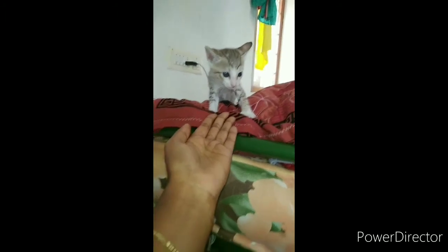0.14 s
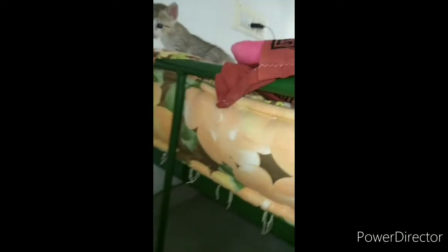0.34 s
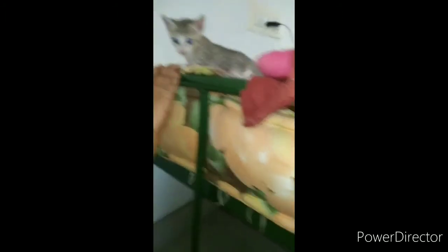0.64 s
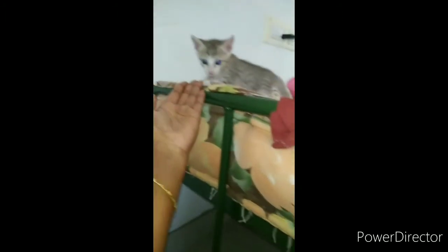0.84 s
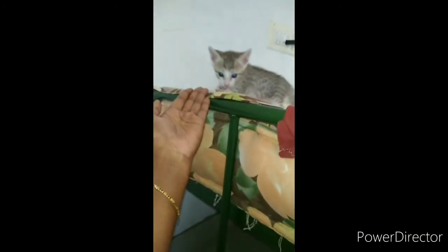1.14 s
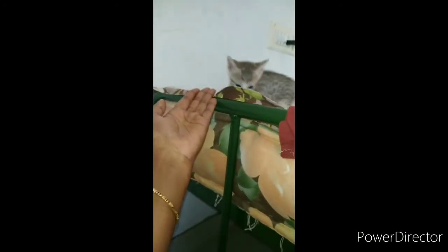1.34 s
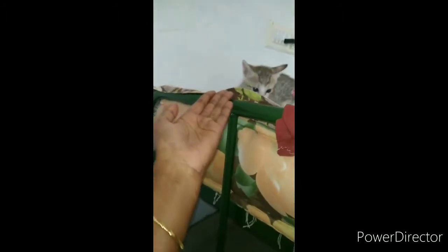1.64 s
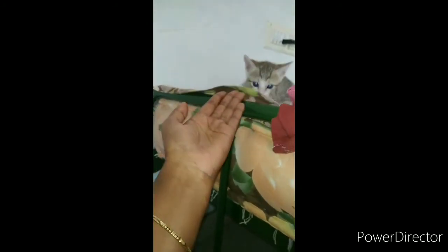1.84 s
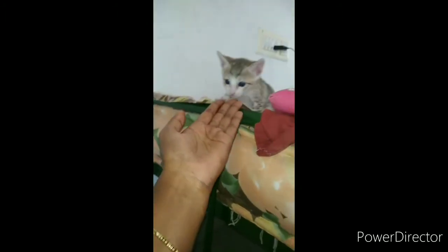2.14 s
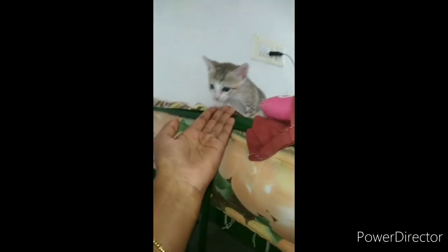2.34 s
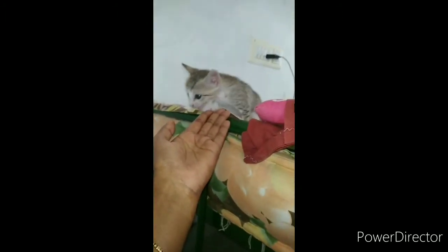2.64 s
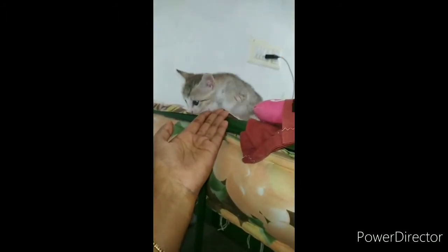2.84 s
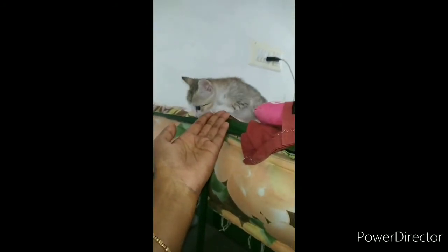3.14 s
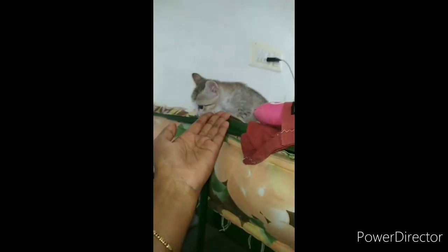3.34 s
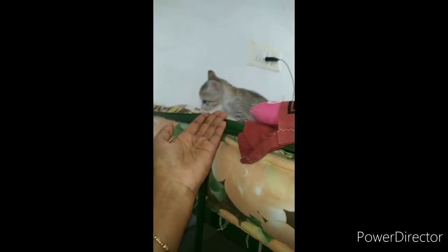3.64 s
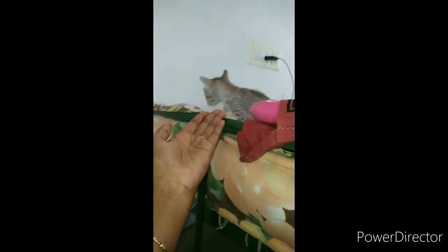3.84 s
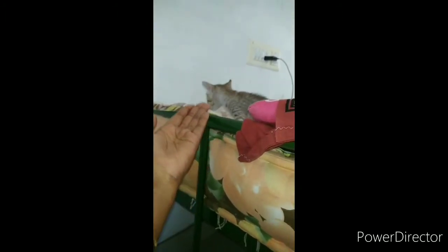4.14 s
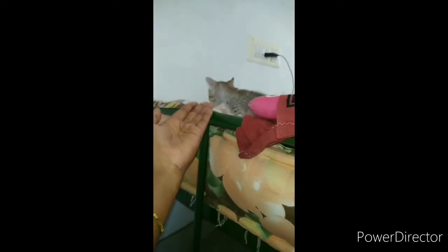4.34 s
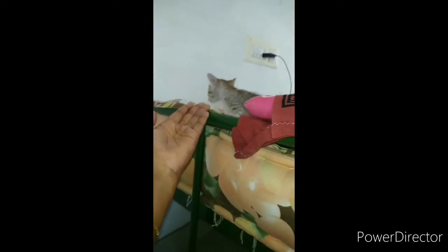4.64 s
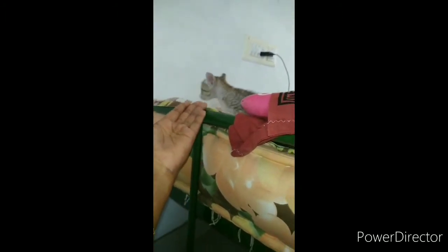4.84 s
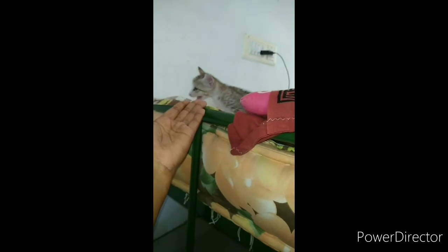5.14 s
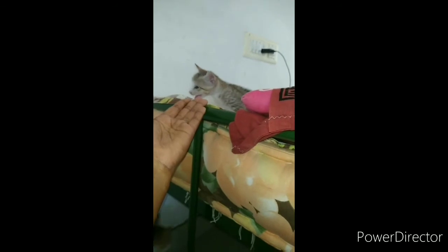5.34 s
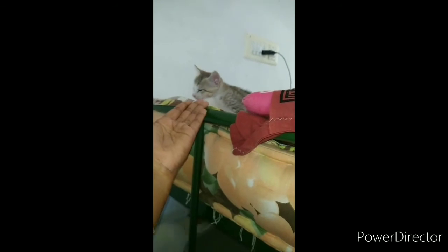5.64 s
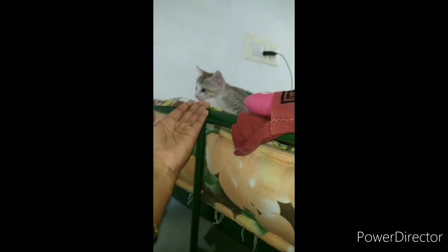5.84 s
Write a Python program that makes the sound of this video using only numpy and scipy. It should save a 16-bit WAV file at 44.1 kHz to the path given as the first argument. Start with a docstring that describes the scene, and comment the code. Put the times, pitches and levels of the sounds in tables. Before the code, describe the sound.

Phone pickup of kittens indoors: piercing little mews, some overlapping, each with a short bright room reflection. Faint cloth brushes come between them. One quiet dull tap precedes a low wavering adult cat meow, then a strong high mew with a second kitten on its tail. Handling bumps and swishes close it while the low hum and airy hiss rise slightly.

```python
"""Kittens mew close to a phone in a small hard-walled room, overlapping; an older cat answers lower.
Cloth rustles and bumps near the microphones, something taps once, thin tones come and go over hum and hiss.
Calls are stacks of partials on trembling pitch curves, with breath noise, and the walls answer them.
Rustles and the tap are short noise bursts, the thin tones are fuzzy sines, and the bed is shaped noise
with a drone and an earlier mew's ringing at the start."""
import sys
import numpy as np
from scipy import signal
from scipy.fft import rfft, irfft, next_fast_len
from scipy.io import wavfile
from scipy.ndimage import uniform_filter1d, map_coordinates

SR = 44100
rng = np.random.default_rng(int(sys.argv[2]) if len(sys.argv) > 2 else 0)


def elevation(decibels):
    """Turn decibel levels (scalar or array-like) into linear amplitude ratios."""
    levels = np.asarray(decibels, float)
    return 10 ** (levels / 20)


def waveform_to_disk(signal):
    """Save audio, clipped to [-1, 1], as 16-bit WAV at the path in sys.argv[1]."""
    frames = np.transpose(np.atleast_2d(signal))
    scaled = np.clip(frames, -1, 1) * 32767
    samples = np.round(scaled).astype(np.int16)
    wavfile.write(sys.argv[1], SR, samples)


N = 263700
TIME = np.arange(N) / SR


def unit(x):
    """Bring to rms 1."""
    return x / np.sqrt(np.mean(x ** 2) + 1e-20)


def along(points, hz):
    """Read a curve of (f/Hz, value) points on a log frequency axis."""
    f, v = np.transpose(points)
    return np.interp(np.log(hz + 1), np.log(f + 1), v)


def wobble(rate, size=N):
    """A smooth random curve, rate knots a second."""
    knots = rng.standard_normal(int(size * rate / SR) + 4)
    return map_coordinates(knots, [np.arange(size) * rate / SR])


def filtered(x, response):
    """Multiply the spectrum of x by a complex response of frequency."""
    m = next_fast_len(N + 8192)
    return irfft(rfft(x, m) * response(np.fft.rfftfreq(m, 1 / SR)), m)[..., :N]


def rush(gain, patchy_db):
    """Stereo noise of rms 1 with patches of random gain; its width and lean vary with frequency."""
    # left-right correlation of the noise: f/Hz, correlation
    likeness = [(60, 0.87), (180, 0.38), (550, 0.57), (1650, 0.018), (4970, 0.24), (15000, 0.59)]
    # left over right: f/Hz, level/dB
    tilt = [(60, -1.5), (180, 14.5), (550, -0.5), (1650, 2.5), (4970, -0.5), (15000, 0.5)]
    z = signal.stft(rng.standard_normal((2, N)), nperseg=512)[2]
    field = uniform_filter1d(rng.standard_normal(z.shape[1:]), 8, axis=0)
    field = uniform_filter1d(field, 10, axis=1)
    pair = signal.istft(z * elevation(patchy_db * unit(field)), nperseg=512)[1][:, :N]

    def mid_side_gain(hz):
        turn = np.arccos(np.clip(along(likeness, hz), -1, 1)) / 2
        return gain(hz) * [np.cos(turn), np.sin(turn)]

    mid, side = filtered(pair, mid_side_gain)
    both = np.array([mid + side, mid - side])
    return unit(filtered(both, lambda hz: elevation(np.outer([.5, -.5], along(tilt, hz)))))


def voice(rows, upper_db, slope_db, hoarse_s, third_db, third_follows, jitter, breath_db, full_hz):
    """Smooth vocal folds: a stack of partials on a slightly trembling pitch, with breath pulsing once a cycle."""
    # the mouth's color on the 4th and higher partials: f/Hz, level/dB
    mouth = [(1500, 3), (4000, 8.5), (5500, -7.5), (8000, -9), (9500, -1.5), (11000, -9.5), (13000, -13.5),
             (15500, -41)]
    brightens = .3  # dB the 3rd and higher partials gain for each dB of effort
    slack_db_per_octave = 18  # the 3rd and higher partials fade as the folds slacken below full voice
    hoarse_least, hoarse_most = .1, .65  # scatter of the cycles' size, rising as the call runs out of air
    hoarse_grows_s = .15  # longest onset of the hoarseness

    s, *cols = np.transpose(rows)
    at = slice(round(s[0] * SR), round(s[-1] * SR))
    t = TIME[at]
    hz, level_db, open_db = [np.interp(t, s, c) for c in cols]
    effort_db = level_db - level_db.max()
    slack_octaves = np.minimum(np.log2(hz / full_hz), 0)
    first = level_db - 10 * np.log10(1 + elevation(open_db) ** 2)  # 1st and 2nd together make level_db
    third = first + third_db + third_follows * open_db
    third = third + brightens * effort_db + slack_db_per_octave * slack_octaves
    partial_db = [first, first + open_db, third]

    hz = uniform_filter1d(hz, size=900, mode="nearest")  # muscles round the corners
    waver = .007 * wobble(24, size=len(t))
    hz = hz * (1 + waver + jitter * wobble(59.45, size=len(t)))
    phase = 2 * np.pi * np.cumsum(hz) / SR
    tone = 0
    for k in range(1, 13):
        if k <= 3:
            db = partial_db[k - 1]
        else:
            db = third + upper_db + slope_db * (k - 4) + along(mouth, k * hz)
        shimmer = (2.2 + .3 * k) * wobble(45, size=len(t))
        audible = k * hz < 15500
        tone = tone + np.sqrt(2) * elevation(db + shimmer) * audible * np.sin(k * phase + k * k)

    onset = np.clip((t - s[-1] + hoarse_s) / min(hoarse_s, hoarse_grows_s), 0, 1)
    hoarse = hoarse_least + (hoarse_most - hoarse_least) * onset
    tone = tone * (np.sqrt(1 - hoarse ** 2) + hoarse * wobble(300, size=len(t)))
    air = elevation(breath_db) * unit(np.diff(rng.standard_normal(len(t) + 1)))
    breath = elevation(level_db) * (1 + 0.63 * np.sin(phase)) * air
    edge = np.clip(np.minimum((t - s[0]) / 0.0055, (s[-1] - t) / 0.019), 0, 1)
    out = np.zeros(N)
    out[at] = edge * (tone + breath)
    return out


def walls(x):
    """Each frequency of the room's answer dies at its own speed, differently at each microphone."""
    # decay of the room: f/Hz, t60/s
    decay = [(300, 0.22), (1500, 0.37), (4000, 0.33), (12000, 0.53)]
    hz, t, z = signal.stft(rng.standard_normal((2, SR // 2)), SR, nperseg=256)
    tail = signal.istft(z * elevation(-60 * t / along(decay, hz)[:, None]), SR, nperseg=256)[1]
    late = np.pad(x, (200, 0))[None]  # the answer starts 200 samples after the call
    return signal.fftconvolve(late, tail / np.linalg.norm(tail[0]), axes=1)[:, :N]


def cats():
    """Each call reaches the two microphones with its own lag and lean, then the room answers."""
    # one table a call: t/s, pitch f/Hz, level ahead of the mix/dB, mouth opening (2nd partial over 1st)/dB
    kitten = [
        [(.33, 1372, -82, -23), (.34, 1329, -52.5, 0), (.41, 1242, -48.5, -24), (.472, 1220, -61, -14),
         (.63, 1205, -78.5, -14)],
        [(1.43, 1399, -61, -25), (1.45, 1532, -45, -9.5), (1.58, 1635, -45.5, -8), (1.664, 1517, -47.5, -14),
         (1.784, 1236, -52, -23), (1.88, 1011, -56.5, -11)],
        [(2.07, 1109, -60.5, 21), (2.11, 1274, -51, 20), (2.218, 1394, -48, 15), (2.27, 1348, -50, 17.5),
         (2.43, 1245, -58.5, -3), (2.46, 1300, -69, -18)],
        [(2.715, 1110, -45, 5.5), (2.744, 1113, -57, -19), (2.814, 1498, -38.5, 20), (2.83, 1560, -33, 14.5),
         (2.865, 1622, -37, 13), (2.92, 1565, -35.5, 12.5), (2.99, 1549, -39.5, 7), (3.026, 1507, -45.5, 13),
         (3.094, 1369, -46, -4.5), (3.156, 1126, -47, 9), (3.18, 936, -54.5, 3.5), (3.205, 690, -51, -10)],
        [(5.324, 1772, -45.5, 5), (5.345, 1801, -30, 19.5), (5.4, 1694, -38, 11), (5.455, 1640, -35, 11),
         (5.52, 1577, -44, -5), (5.627, 1405, -42.5, -26), (5.695, 1310, -49, -12), (5.74, 1153, -56.5, -4),
         (5.8, 982, -60, 4)],
    ]
    sibling = [
        [(.44, 1520, -70, -12), (.452, 1370, -54, -14), (.51, 1520, -98, -10)],
        [(1.19, 865, -70, -4), (1.23, 1000, -59, -16), (1.31, 1291, -61, 11), (1.404, 1353, -52, 16),
         (1.5, 1250, -58.5, -5), (1.602, 1206, -49, -16.5), (1.67, 1254, -56, -16)],
        [(2.44, 1230, -49.5, -39), (2.498, 1384, -57.5, -24), (2.6, 1383, -76, -22)],
        [(3.03, 1132, -55, 7), (3.085, 1290, -56, 23), (3.13, 1293, -58.5, 2), (3.262, 1225, -61.5, -7),
         (3.354, 1371, -56, -37), (3.414, 1368, -58.5, -50), (3.52, 1344, -105, -20)],
        [(5.58, 1440, -43, -2), (5.646, 1400, -50.5, -4), (5.67, 1399, -56, 12), (5.77, 1364, -54, 3),
         (5.96, 1180, -61.5, -23)],
    ]
    third_kitten = [
        [(1.22, 494.3, -60, 2), (1.266, 526, -61, 0.5), (1.366, 840, -62, -24), (1.478, 1045, -53, -12.5),
         (1.58, 1054, -58.5, -5.5), (1.694, 912, -61, -5), (1.75, 847, -72, -18)],
    ]
    elder = [
        [(3.99, 328.8, -70, 1), (4.068, 432, -52.5, 0.5), (4.158, 528, -51, 9), (4.3, 572.6, -55, -5),
         (4.376, 549, -55, 8), (4.5, 568, -51.5, -8.5), (4.626, 556.7, -52.5, -16), (4.694, 579.6, -48.5, -3.5),
         (4.826, 514.3, -53.5, 1.5), (4.86, 468.8, -58.5, 5), (4.966, 433, -59, -2), (5.07, 425, -60, -15),
         (5.15, 410, -78, -22)],
    ]
    # one list a cat in that order, one row a call: left leads/ms, left over right/dB,
    # upper partials' level/dB, their slope/dB a partial, hoarse ending/s
    places = [
        [(.1, 4, 5, .1, .01), (-.15, 1.5, -1.5, .7, .03), (-.15, 5, -1, .8, .01), (-.153, 4, -2, .6, .03),
         (-.15, 3, -5, 0.1, .1)],
        [(-.0076, 2, -4, 1, .01), (-.13, 7.5, -1.5, .6, .01), (-.13, 4, 8, 1.5, .03), (-.12, 2, -7, 1.3, .01),
         (-.17, 2, -10, 2, .3)],
        [(.05, .5, 4, -2, .01)],
        [(.25, 5, -18, -8, .45)],
    ]
    # one row a cat: base level of 3rd partial over 1st/dB, share of the opening it follows,
    # pitch jitter/share, breath level/dB, full-voice pitch f/Hz
    throats = [(-12.5, 0.57, 0.00453, -41, 1210), (-9, .55, 0.0068, -22, 990), (-5, 1, 0.0051, -14, 880),
               (-2.5, 0.079, 0.0076, -22, 500)]
    out, side = np.zeros((2, N)), np.array([[.5], [-.5]])
    for calls, spots, throat in zip((kitten, sibling, third_kitten, elder), places, throats):
        for rows, (lead_ms, lean_db, *timbre) in zip(calls, spots):
            call = voice(rows, *timbre, *throat)

            def path(f):
                return elevation(side * lean_db) * np.exp(2j * np.pi * f * side * lead_ms / 1000)

            out += elevation(4.0) * filtered(call, path) + elevation(3.5) * walls(call)
    return out


def rustles():
    """Cloth brushing the phone: a short bright swish and a dull bump in the case that grows almost in step."""
    # brushes: t/s, strength/dB, swish t60/s
    brushes = [(1.275, -47.5, 0.18), (1.309, -50.5, 0.24), (1.333, -57, 0.15), (1.4056, -54, 0.15),
               (2.013, -56.5, 0.25), (2.5672, -53, 0.15), (2.6034, -55, 0.048), (2.6542, -52, 0.054),
               (3.648, -51.5, 0.064), (5.444, -52.5, .22), (5.6129, -30, 0.042), (5.7073, -36.5, 0.052),
               (5.7379, -36.5, 0.072), (5.775, -47, 0.2), (5.8765, -44.5, 0.092), (5.913, -34.5, 0.04),
               (5.9628, -45.5, 0.085)]
    # color of the cloth: f/Hz, relative level/dB
    cloth = [(300, -5), (1500, -6), (3600, -6), (5800, -5.5), (9450, 3), (12600, -11), (15500, -4)]
    swish_attack_s = .0035
    bump_db, bump_grows = -40.5, 0.92  # bump's drive at a -45 dB brush; dB per dB of brush
    swish, bump, t = np.zeros(N + SR), np.zeros(N + SR), TIME[:SR // 4]
    push = t / 0.0015
    thump = (1 - push) * push * np.exp(-push)
    for s, db, t60 in brushes:
        start = round(s * SR)
        swish[start:][:len(t)] += elevation(db + 1.5 - 60 * t / t60) * (1 - np.exp(-t / swish_attack_s))
        bump[start:][:len(t)] += elevation(bump_db + bump_grows * (db + 45)) * thump
    return swish[:N] * rush(lambda hz: elevation(along(cloth, hz)), patchy_db=0.0) + bump[:N]


def knock():
    """One dull tap somewhere in the room: a quick burst of noise without much bass or treble."""
    t = np.maximum(TIME - 3.643, 0)
    envelope = elevation(-51.5 - 60 * t / .09) * (1 - np.exp(-t / .003))

    def dull(hz):
        return 1 / (1 + (hz / 1900) ** 6) / (1 + (300 / (hz + 1)) ** 4)

    return envelope * rush(dull, patchy_db=0)


def whistles():
    """Faint, fuzzy tones that creep up or down; the higher, the wider."""
    # glides: start t/s, end t/s, from f/Hz, to f/Hz, level/dB
    glides = [(0.0, 5.98, 4770, 4590, -78), (0.0, 4.5, 9470, 9420, -74), (1.99, 2.07, 958, 856, -59.5),
              (2.28, 2.31, 394, 360, -58), (2.4, 2.75, 6570, 7050, -63), (3.42, 3.92, 6640, 7040, -65.5),
              (4.1, 4.42, 8500, 8900, -62), (4.2, 4.32, 3800, 4000, -65), (5.078, 5.32, 6670, 6610, -68),
              (5.448, 5.533, 742, 917, -57)]
    out = np.zeros((2, N))
    for start, end, from_hz, to_hz, db in glides:
        share = np.clip((TIME - start) / (end - start), 0, 1)
        tone = np.sin(2 * np.pi * np.cumsum(from_hz + (to_hz - from_hz) * share) / SR)
        fuzz = np.array([wobble(from_hz / 25), wobble(from_hz / 25)])
        out += elevation(db) * np.sin(np.pi * share) ** .5 * fuzz * tone
    return out


def bed_noise(gain):
    """Slightly patchy stereo noise of rms 1, the raw stuff of the background."""
    return rush(gain, patchy_db=.6)


def hand():
    """A hand shifting on the phone, 0 to 1: it raises the hum and the hiss near the end."""
    return np.clip((TIME - 5.23) / 0.17, 0, 1)


def hiss(calls):
    """Airy noise, strongest at first, that flickers and swells with the calls and under the hand."""
    # color of the hiss: f/Hz, relative level/dB
    airy = [(530, -33), (900, -3), (1400, -5.5), (2570, -5), (4300, -9), (4700, -12.5), (5700, -13),
            (6900, -10), (8600, -10.5), (9500, -9), (10500, -14.5), (15500, -16.5)]
    quiet_db, swell_most_db, hand_db = -65, 7.5, 6
    knee_db, smooth_s = -49, .07  # call level at half the swell; averaging time of the swell
    start_db, settles_s = 11, 0.16  # extra hiss at first, and how fast it settles
    loud = np.sqrt(np.abs(uniform_filter1d(np.mean(calls ** 2, axis=0), size=2000)))
    busy = uniform_filter1d(loud / (loud + elevation(knee_db)), round(smooth_s * SR))
    swell_db = np.maximum(swell_most_db * busy, hand_db * hand())
    swell_db = swell_db + start_db * np.exp(-TIME / settles_s)
    flicker_db = 1.1 * wobble(7) + 1.1 * wobble(16)
    return elevation(quiet_db + swell_db + flicker_db) * bed_noise(lambda hz: elevation(along(airy, hz)))


def hum():
    """Low rumbling noise, a little louder under the hand."""
    # color of the hum: f/Hz, relative level/dB
    low = [(15, -40), (28, -1), (50, -11.5), (80, -6), (150, -16), (295, -13), (530, -17), (690, -13.5),
           (950, -26), (1500, -23.5), (2500, -54)]
    return elevation(-62 + 3 * hand()) * bed_noise(lambda hz: elevation(along(low, hz)))


def drone():
    """Noise through a row of resonances that stops short after the first third of a second."""
    # resonances: center f/Hz, half-width/Hz, relative level/dB
    resonances = [(81.6, 7.1, 3), (241, 6.1, 4), (493, 20, -20), (734, 115, -9), (1230, 73, -28),
                  (2490, 400, -24.5)]

    def ring(f):
        return sum(elevation(db) * w / np.sqrt((f - c) ** 2 + w ** 2) for c, w, db in resonances)

    fade_db = np.interp(TIME, [0, .15, .325, .335], [-49.5, -53, -52.5, -100])
    return elevation(fade_db) * bed_noise(ring)


def echo():
    """An earlier mew still ringing in the room: two dying bands of noise, cut off after 0.33 s."""
    # bands: center f/Hz, half-width/Hz, level at the start/dB
    bands = [(1230, 100, -53.5), (2630, 260, -55.5)]
    out = np.zeros((2, N))
    for hz, width, db in bands:
        out += elevation(db - 60 * TIME / .5) * bed_noise(lambda f: np.exp(-((f - hz) / width) ** 2))
    return out * (TIME < .33)


def scene():
    """Everything at the two microphones."""
    calls = cats()
    return calls + rustles() + knock() + whistles() + hiss(calls) + hum() + drone() + echo()


def low_pass(x):
    """Removes everything above the highest recorded frequency."""
    return signal.sosfilt(signal.butter(12, 15730, fs=SR, output="sos"), x)


def record(dry):
    """The microphones fall off at the very top, with nothing from 15.7 kHz up."""
    mix = filtered(dry, lambda hz: (hz < 15700) / (1 + (hz / 15200) ** 16))
    return low_pass(mix)


dry = scene()
out = record(dry)
waveform_to_disk(out)
```